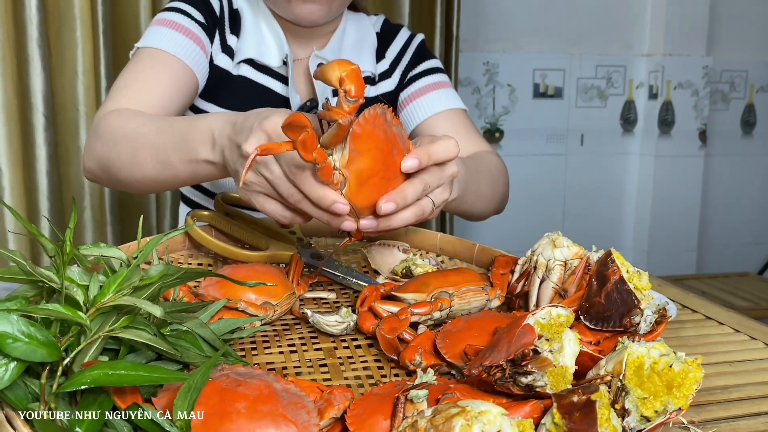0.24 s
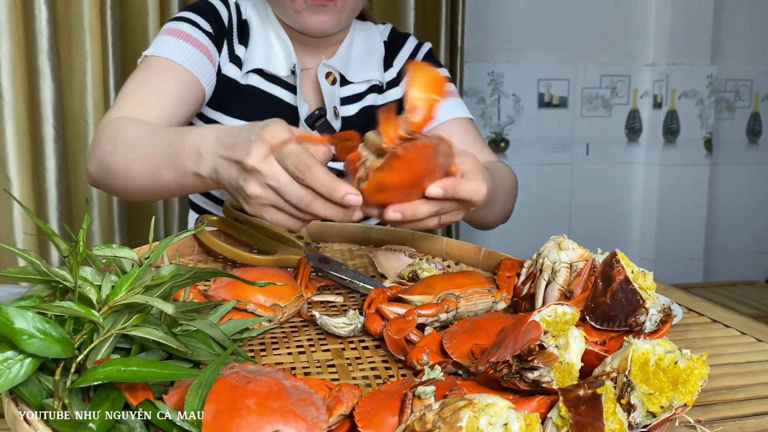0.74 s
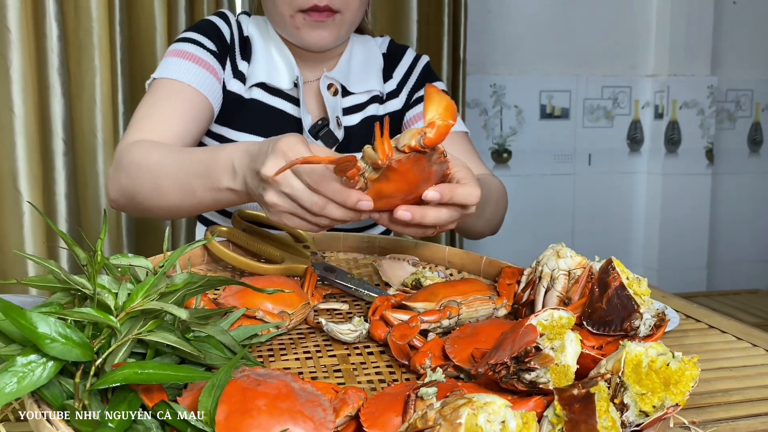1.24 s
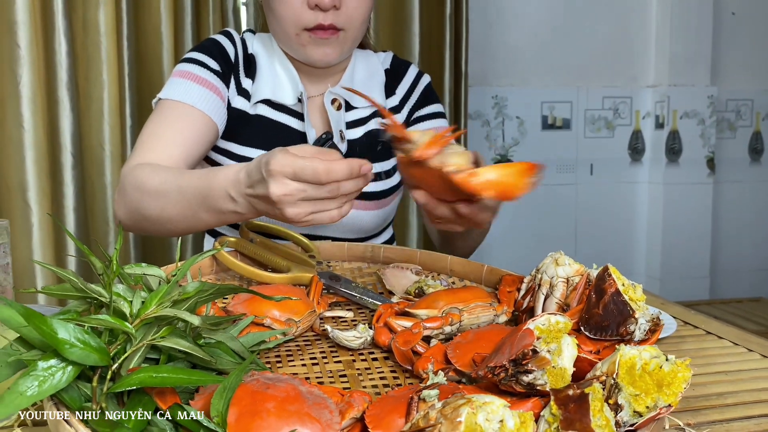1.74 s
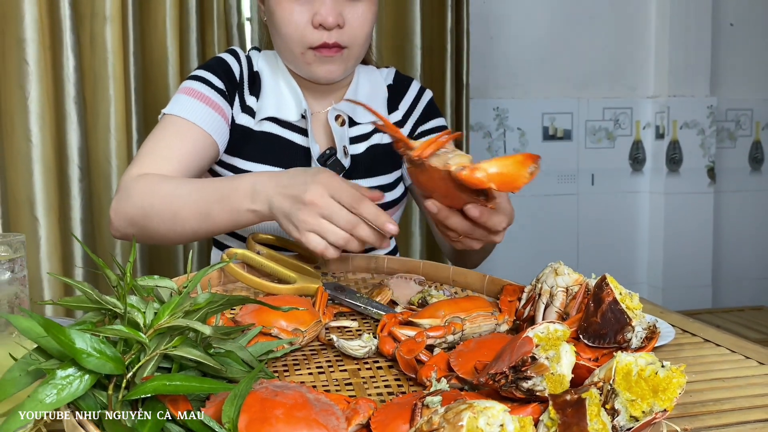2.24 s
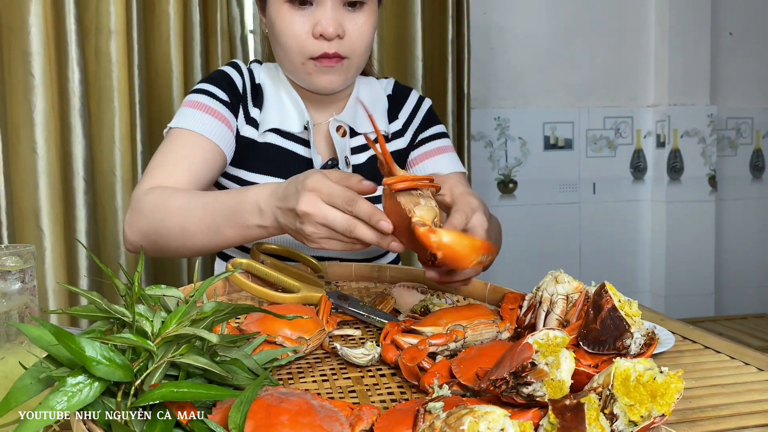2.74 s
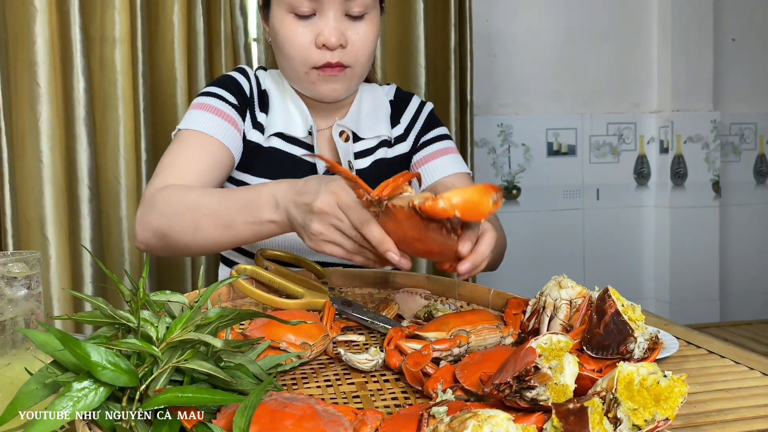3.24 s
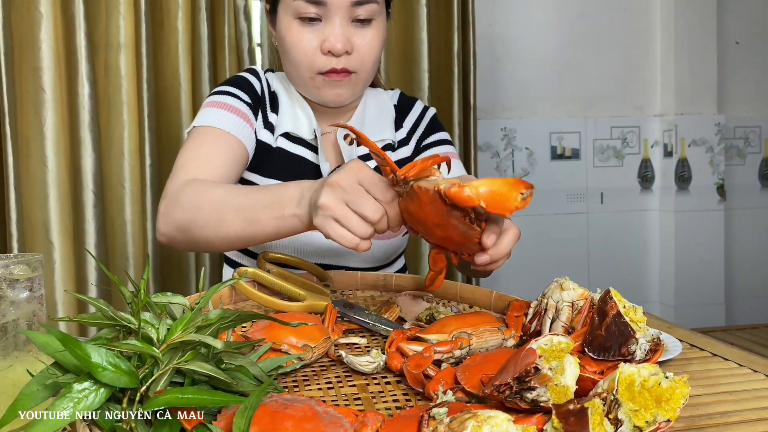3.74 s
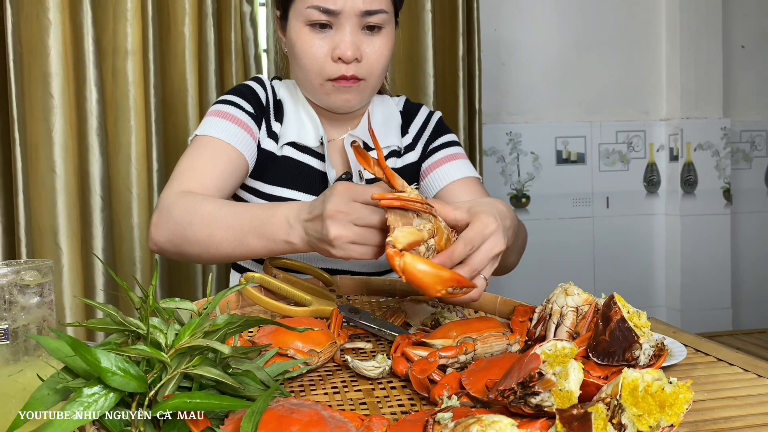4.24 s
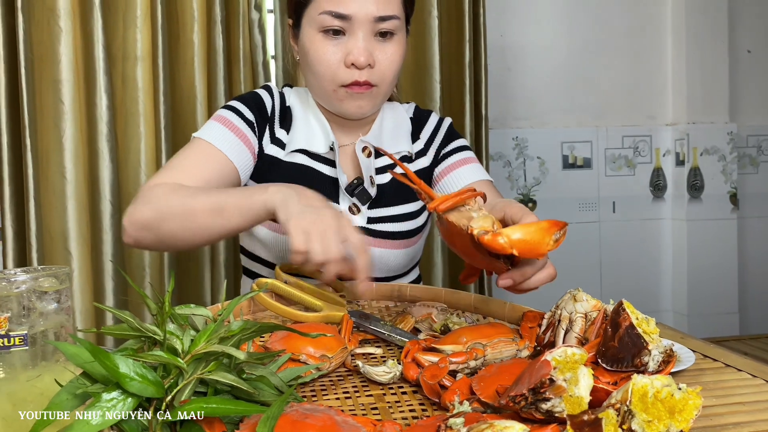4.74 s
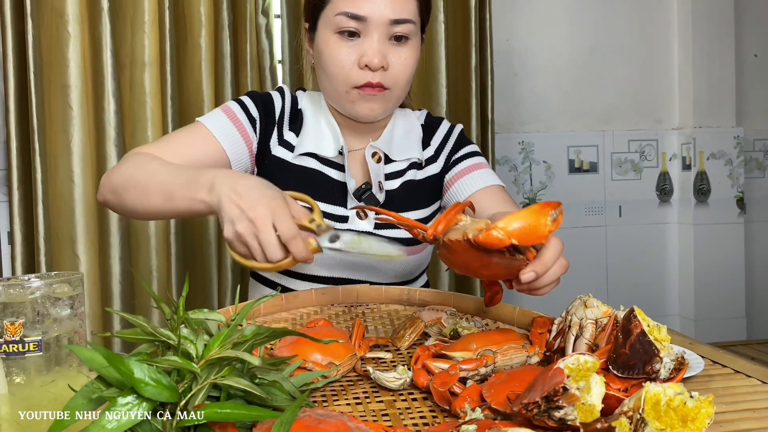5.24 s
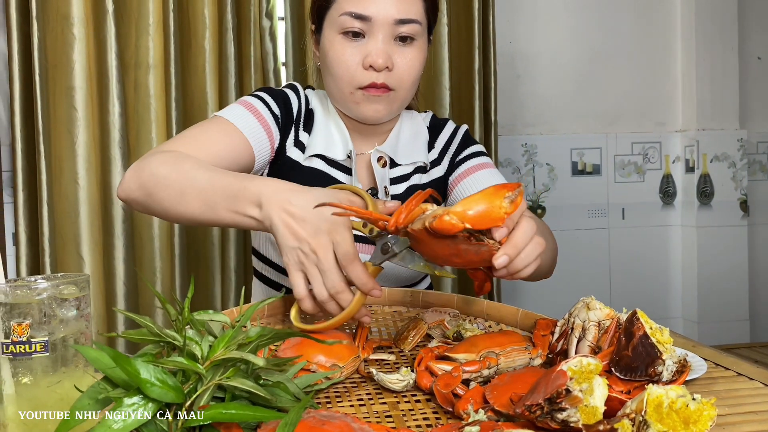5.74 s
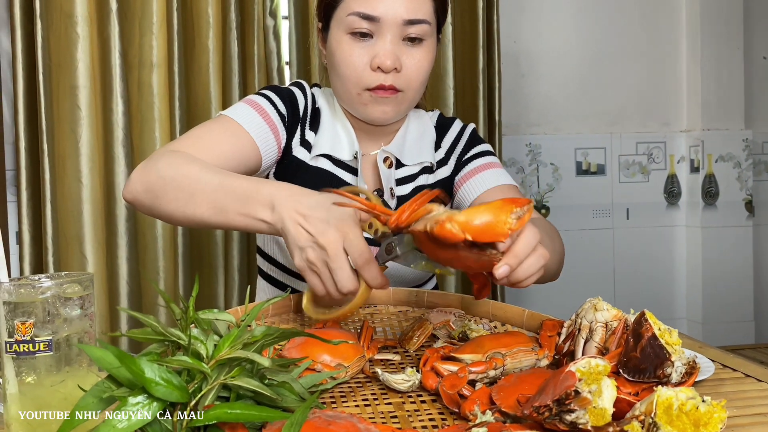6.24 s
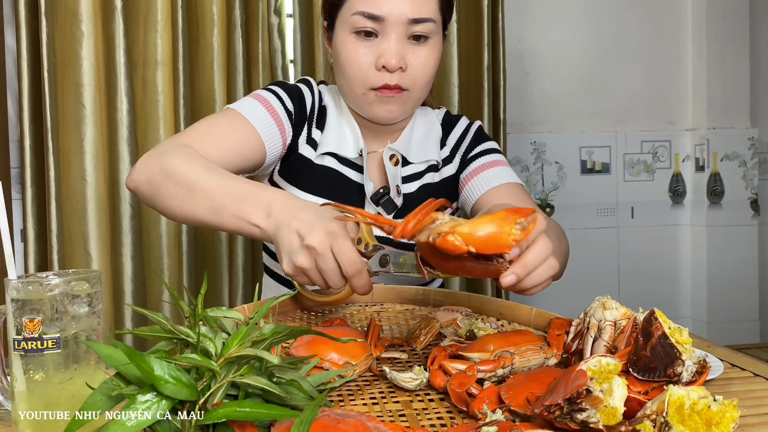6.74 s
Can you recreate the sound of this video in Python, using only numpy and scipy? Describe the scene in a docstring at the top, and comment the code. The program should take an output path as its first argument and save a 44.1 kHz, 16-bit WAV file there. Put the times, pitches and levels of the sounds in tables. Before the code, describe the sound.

In a small quiet room with a faint motor hum, crab shell ticks, creaks and cracks between the fingers, close up, in irregular bursts with pauses between. A ringing metal clink follows as scissors are lifted, with a few lighter clicks as they open. They crunch into a crab leg in a quick run of brittle cracks, ending in a single loud snap with a brief echo.

```python
"""Cracking a crab at the table

A cooked crab is pulled apart by hand over a table, close to the microphone in a small quiet room.
Its joints tick and crunch as fractures ring pieces of shell. Steel scissors are picked up with a clink,
opened, and bite into a leg, which crackles under the blades and gives way with one loud snap.
Behind it all lie the room's short echo, its steady air and the hum of a distant motor."""
import sys
import numpy as np
from scipy import signal
from scipy.fft import rfft, irfft
from scipy.io import wavfile

SR = 44100
rng = np.random.default_rng(int(sys.argv[2]) if len(sys.argv) > 2 else 0)


def pcm_store(signal):
    """Save signal as 16-bit PCM."""
    levels = np.round(np.clip(np.atleast_2d(signal), -1, 1) * 32767)
    wavfile.write(sys.argv[1], SR, levels.astype(np.int16).T)


N = 308700
HZ = np.fft.rfftfreq(4096, 1 / SR)
IMPACT_S = 1 / 200  # levels of single impacts are rms over this time
IMPACT_GAIN = np.sqrt(IMPACT_S * SR)
SCISSORS_FROM_S = 5.0  # the shell breaks in the hands before this, between the blades after

# Single cracks close to the microphone: joints give, a small leg is twisted off, the blades bite in.
# Each row: start in seconds, strength in dB, hollowness in dB, brightness in dB.
CRACKS = [(0.3219, -54, -15, 3), (0.5, -36.5, -4, -1.5), (0.7107, -54.5, -21, 2), (0.7376, -30.5, -25, 1.5),
          (0.7599, -32, -25, 0), (0.7784, -36.5, -17, 2), (0.7838, -38.5, -16, -0.5),
          (0.8012, -39.5, -14, 1.5), (0.84, -47, -24, 0.5), (1.2398, -53.5, -24, 1),
          (1.2763, -47, -13, 4.5), (1.4794, -56, -17, 1), (1.499, -56, -27, 5), (1.5146, -42, -26, 3.5),
          (1.63, -50.5, -17, 2), (1.7037, -41.5, -11, -0.5), (2.1505, -43.5, -17, -3),
          (2.5708, -56, -1, 2.5), (2.7545, -66, 5, 2), (3.6282, -36.5, -15, 4.5), (3.684, -40.5, -2, -5),
          (3.7485, -44.5, -12.5, 2.5), (3.7857, -55, -12, 2), (3.8875, -32, -13.5, 4.5),
          (3.923, -41, -6.5, 0.5), (3.952, -45, -11, 3.5), (3.978, -42, -4, 1.5), (4.002, -40, -19, 5),
          (4.0498, -38.5, -9.5, 6), (4.0968, -28, -9, 3), (4.0997, -32, -8.5, 7), (4.216, -47.5, -3, 3),
          (4.235, -51.5, 9, 3), (4.2663, -54.5, 13.5, -5.5), (4.296, -50.5, -4, 4), (4.34, -41.5, -1, -0.5),
          (4.6097, -57, -0.5, -4), (5.6868, -49.5, 10.5, -4.5), (6.0085, -55.5, 9.5, -4.5),
          (6.2342, -34, -24, 5.5), (6.2478, -42, -17, 4), (6.2752, -34, -6, -2), (6.288, -20.5, -37, 6.5),
          (6.3246, -30.5, -28, 1.5), (6.332, -34.5, -18, -0.5), (6.3926, -34, -17.5, -3.5),
          (6.411, -43, -27, 1), (6.4875, -22.5, -16, 0), (6.5229, -26.5, -13.5, -0.5),
          (6.5988, -42.5, -9, 3), (6.621, -40, -10, 2), (6.6424, -34.5, -12, 3), (6.7033, -32, -23.5, 0.5)]
def cracks(pieces, usual_db=-38.5, db_per_doubling=38, rattle_db=-17, rattle_s=0.0051):
    """A sharp release, a split that runs on longer in strong cracks, and a faint rattle of the shell."""
    out, t = np.zeros(N), np.arange(SR // 50) / SR
    for s, strength_db, hollow_db, bright_db in CRACKS:
        usual_split_s = 0.0019 if s > SCISSORS_FROM_S else 0.0012
        split_s = usual_split_s * 2 ** ((strength_db - usual_db) / db_per_doubling)
        split, rattle = rng.standard_normal((2, len(t)))
        force = unit(split * np.exp(-t / split_s)) + amp(rattle_db) * unit(rattle * np.exp(-t / rattle_s))
        force[0] += 1  # the release
        add(out, s, shell(force, pieces, s, strength_db, hollow_db, bright_db, IMPACT_S))
        add(out, s, amp(strength_db - bright_db) * IMPACT_GAIN * plate_ring(t))  # dull cracks ring more
    return out


# Bending notes of the shell plate. Each row: pitch in Hz, relative level in dB, t60 in seconds.
PLATE_MODES = [(3076, -17, 0.018), (3538, -10.5, 0.013)]
def plate_ring(t, detune=.03):
    """The plate rings briefly after a crack, a little higher or lower each time."""
    size = 1 + detune * rng.standard_normal()
    return sum(amp(db) * unit(amp(-60 * t / t60) * np.sin(2 * np.pi * hz * t / size))
               for hz, db, t60 in PLATE_MODES)


# The shell creaks, tears or is crushed, close up. Each row: start and length in seconds,
# fractures per second, then relative strength, hollowness and brightness in dB.
CRUNCHES = [(0.05, 0.15, 37, -83, 2, 1), (0.696, 0.017, 350, -60, -24, 3),
            (0.767, 0.014, 1100, -44, -11, -5), (0.792, 0.031, 940, -56, -1, 0),
            (1.181, 0.079, 130, -72.5, -18, -4.5), (1.295, 0.015, 900, -52, -7.5, 0.5),
            (1.689, 0.048, 1070, -53.5, 3, 0), (2.12, 0.023, 1260, -64, 7, -6),
            (2.622, 0.019, 1160, -60.5, -10, -2), (2.831, 0.16, 24, -77, 1, -4),
            (4.284, 0.068, 220, -55, -11, 2.5), (5.689, 0.029, 1930, -55.5, 10, -2),
            (5.851, 0.025, 1200, -66, 10.5, 0), (5.995, 0.021, 1570, -50.5, 2, -2),
            (6.178, 0.046, 140, -66, -19, 4.5), (6.282, 0.03, 1700, -24.5, -11, 2.5),
            (6.311, 0.034, 1440, -42.5, -1.5, -1), (6.536, 0.015, 1330, -36.5, -5.5, 2)]
def crunches(pieces, spread_db=1.5, gain_db=-2):
    """Tiny fractures of uneven size: a slow run creaks tick by tick, a fast one blurs into a crunch."""
    out = np.zeros(N)
    for s, length_s, per_second, strength_db, hollow_db, bright_db in CRUNCHES:
        chance, size, sign = rng.random((3, SR // 4))[:, :round(length_s * SR)]
        fractures = (chance < per_second / SR) * np.sign(sign - .5)
        force = fractures * amp(-spread_db * np.log(size + 0.06))
        force *= signal.windows.tukey(len(force), .2)
        add(out, s, shell(force, pieces, s, strength_db, hollow_db, bright_db, length_s))
    return amp(gain_db) * out


# Colour of the leg as it is cut through. Each row: frequency in Hz, gain in dB.
SNAP_COLOUR = [(50, -22), (250, -13.5), (600, -2), (1000, 0), (1300, -4.5), (2000, -5.5), (2500, -5),
               (3400, 0.5), (3900, 4), (4600, -2), (6700, 7.5), (7400, 6), (8000, 8), (9200, -1.5),
               (10400, 4.5), (11700, -3), (13400, 8.5), (16000, -14)]
def snap(peak_s=6.7792, db=-8, strain_s=0.0019, strain_db=-8, burst_s=0.0017, push_db=-29, push_s=0.0007):
    """Fractures swell for a few milliseconds until the leg bursts; the jolt sends out a low push."""
    out, t = np.zeros(N), np.arange(-SR // 220, SR // 100) / SR
    swell = np.exp(-(t / burst_s) ** 2) + amp(strain_db) * np.exp(-abs(t) / strain_s)
    burst = signal.fftconvolve(swell * rng.standard_normal(len(t)), causal(amp(read(SNAP_COLOUR, HZ))))
    add(out, peak_s + t[0], amp(db) * IMPACT_GAIN * unit(burst))
    push_age = (t - t[0]) / push_s
    add(out, peak_s, amp(push_db) * push_age * np.exp(1 - push_age))
    return out


def shell(force, pieces, s, strength_db, hollow_db, bright_db, length_s, plate_db=-4, splinter_db=-2.5):
    """A force rings one piece. Hollowness lifts the cavity; brightness trades plate for splinters."""
    levels_db = strength_db + np.array([hollow_db, plate_db - bright_db, 0, splinter_db + bright_db])
    choices = pieces["cut" if s > SCISSORS_FROM_S else "held"]
    bands = signal.fftconvolve(force[None], choices[rng.integers(len(choices))], axes=1)
    return sum(amp(db) * unit(band) for db, band in zip(levels_db, bands)) * np.sqrt(length_s * SR)


# Colour of shell broken in the hands, and between the blades. Each row: frequency in Hz, gain in dB.
HELD_COLOUR = [(80, -23), (170, -8), (420, 0.5), (750, 1), (1150, -4), (1600, -5.5), (3200, -1),
               (4600, -0.5), (7000, 5), (10000, 7.5), (12500, 2.5), (15000, -5.5), (16000, -2.5)]
CUT_COLOUR = [(80, -29.5), (170, -11.5), (400, -3.5), (750, -3.5), (1150, -10.5), (1600, -12.5), (3000, -5),
              (4500, -1), (5500, 0), (9500, 8.5), (11500, 9.5), (15000, 3.5), (16000, -20)]
# Resonances of a middling piece of shell. Each row: centre in Hz, width in Hz, lift in dB.
SHELL_MODES = [(560, 140, 7.5), (863, 370, 8.5), (1964, 280, 5), (2500, 220, -9.5), (3380, 1000, 4.5),
               (6700, 650, -1.5), (7890, 1100, 2.5), (13500, 900, 8)]
def shell_piece(grip, size, plate_hz=1400, edge_hz=5000, splinter_hz=10000):
    """Responses of a piece's cavity, plate, broken edge and splinters. Larger pieces ring lower."""
    colour_db = read(CUT_COLOUR if grip == "cut" else HELD_COLOUR, HZ)
    modes_db = sum(lift / (1 + (2 * (HZ * size - hz) / width) ** 2) for hz, width, lift in SHELL_MODES)
    lowpasses = [1 / (1 + (HZ / hz) ** 10) for hz in (plate_hz, edge_hz, splinter_hz)]
    bands = np.diff(lowpasses, axis=0, prepend=0, append=1)
    return np.array([causal(amp(colour_db + modes_db) * np.sqrt(abs(band))) for band in bands])


# Steel meets steel or shell near the microphone.
# Each row: start in seconds, ring level in dB, opening (0 shut, 1 open), tick in dB against the ring.
CLINKS = [(5.0593, -50, 0, -10), (5.0641, -18, 0, -5), (5.1641, -48, 0, 3), (5.1658, -45.5, 0, 8.5),
          (5.3790, -36.5, 1, -4), (5.383, -33, 1, -15.5), (6.779, -26, 1, -5), (6.985, -46, 1, 1),
          (6.9912, -40, 1, -8)]
# Modes of the scissors, shut and open. Each row: pitch in Hz, relative level in dB, t60 in seconds.
SHUT_MODES = [(3996, 0, 0.075), (3080, -18, 0.064), (7320, -1, 0.04), (7200, -21.5, 0.3),
              (8930, -11.5, 0.073), (10250, -10, 0.056), (13370, -3.5, 0.034), (12870, -23.5, .3),
              (13400, -12.5, .05), (14100, -5, .045), (13900, -6, .04), (2200, -14, 0.027)]
OPEN_MODES = [(3780, -13.5, 0.024), (5534, -9.5, 0.053), (6820, -12.5, 0.045), (7250, -8, 0.027),
              (7500, -11, 0.019), (8160, 5, 0.024), (8580, -31, 0.091), (9900, -13, 0.01),
              (10330, -6, 0.036), (12700, -7, 0.041), (12650, 1, 0.0083), (15300, -3, .02)]
# Colour of the steel's contact tick. Each row: frequency in Hz, gain in dB.
CONTACT_COLOUR = [(200, -22), (1000, -10.5), (2100, -1), (2800, -10.5), (5400, 5.5), (6500, 0.5), (9500, 6),
                  (11500, -4), (13500, 8), (16000, -14)]
def scissors(tick_s=0.0038):
    """A contact tick sets the blades ringing; their modes change once they are open."""
    out, t = np.zeros(N), np.arange(SR // 5) / SR
    contact = causal(amp(read(CONTACT_COLOUR, HZ)))
    for s, db, opening, tick_db in CLINKS:
        modes = OPEN_MODES if opening > .5 else SHUT_MODES
        ring = sum(amp(level - 60 * t / t60) * np.sin(2 * np.pi * (hz * t + rng.random()))
                   for hz, level, t60 in modes)
        tick = signal.fftconvolve(rng.standard_normal(len(t)) * np.exp(-t / tick_s), contact)[:len(t)]
        add(out, s, amp(db) * IMPACT_GAIN * (unit(ring) + amp(tick_db) * unit(tick)))
    return out


def tray(lifted_s=5.063, db=-53, hz=550, decay_s=0.004):
    """The scissors give the woven tray a short, dull knock as they are lifted."""
    out, t = np.zeros(N), np.arange(SR // 20) / SR
    body = signal.butter(2, [hz / 2, hz * 2], "bandpass", fs=SR, output="sos")
    knock = signal.sosfilt(body, rng.standard_normal(len(t)) * np.exp(-t / decay_s))
    add(out, lifted_s, amp(db) * IMPACT_GAIN * unit(knock))
    return out


def settling(pieces, count=30, under_db=-18, spread_db=3.0, mean_delay_s=0.014):
    """Loosened shell settles with a faint tick just after a crack, in proportion to it."""
    out = np.zeros(N)
    for crack in rng.permutation(len(CRACKS))[:count]:
        s, strength_db = CRACKS[crack][:2]
        s += mean_delay_s * rng.gamma(2) / 2
        add(out, s, shell_tick(pieces, s, strength_db + under_db + spread_db * rng.standard_normal()))
    return out


def turning(pieces, count=18, until_s=3.2, strength_db=-73, spread_db=4.5):
    """Loose legs tick against the body at random while the fingers turn the crab over."""
    out = np.zeros(N)
    for when, size in rng.random((count, 2)):
        s, db = when * until_s, strength_db + spread_db * (2 * size - 1)
        add(out, s, shell_tick(pieces, s, db, hollow_db=-12, bright_db=-4))
    return out


def shell_tick(pieces, s, strength_db, hollow_db=-8, bright_db=-1, decay_s=0.0011):
    """One faint tick of strained shell."""
    t = np.arange(SR // 200) / SR
    force = rng.standard_normal(len(t)) * np.exp(-t / decay_s)
    return shell(force, pieces, s, strength_db, hollow_db, bright_db, len(t) / SR)


# Decay of the small room around the table. Each row: frequency in Hz, t60 in seconds.
ROOM_T60 = [(200, .4), (700, 0.77), (1500, 0.5), (4000, 0.51), (8000, 0.49), (15000, 0.43)]
# Colour of its echo at the microphone. Each row: frequency in Hz, relative gain in dB.
ROOM_COLOUR = [(200, -10.5), (600, -14.5), (1200, -1.5), (3000, -11), (7000, -12.5), (13000, -12.5),
               (16000, -9)]
def room(x, first_delay_s=0.0013, build_s=0.00094, early_db=3, early_s=0.057):
    """Dense reflections build up quickly, strongest early on; each band dies at its own speed."""
    hz, frame_s, bands = signal.stft(rng.standard_normal(SR), SR, nperseg=256)
    t60 = read(ROOM_T60, hz)[:, None]
    bands *= amp(read(ROOM_COLOUR, hz)[:, None] - 60 * frame_s / t60)
    bands *= np.sqrt(np.log(1e6) / (t60 * SR))  # a longer decay adds no energy
    tail, t = signal.istft(bands, SR, nperseg=256)[1][:SR], np.arange(SR) / SR
    build_up = 1 - np.exp(-np.maximum(t - first_delay_s, 0) / build_s)
    early_lift = amp(early_db * np.exp(-t / early_s))
    return signal.fftconvolve(x, tail * build_up * early_lift)[:N]


# Colour of the quiet room's air. Each row: frequency in Hz, relative gain in dB.
AIR_COLOUR = [(15, -24.5), (25, -13), (42, -12.5), (70, -12), (100, -8.5), (130, -6), (200, -6), (290, -3),
              (360, -9), (550, -9.5), (1000, -17), (2300, -28.5), (4200, -27), (8000, -34.5),
              (14000, -33.5), (16000, -41.5)]
# A motor far from the microphone. Each row: pitch in Hz, level in dB.
MOTOR_HUM = [(40, -76), (61, -83.5), (100, -74.5), (280, -77.5)]
def room_tone(air_db=-66, hum_width_hz=0.83):
    """Steady room noise with the wavering hum of a distant motor."""
    hz = np.fft.rfftfreq(N, 1 / SR)
    noise = rfft(rng.standard_normal(N))
    out = amp(air_db) * unit(irfft(noise * amp(read(AIR_COLOUR, hz)), N))
    for centre, db in MOTOR_HUM:
        narrow_peak = 1 / (1 + ((hz - centre) / hum_width_hz) ** 2)
        out += amp(db) * unit(irfft(1j * noise * narrow_peak, N))
    return np.sqrt(N) * out


def amp(db):
    """Decibels to gain."""
    return 10 ** (np.asarray(db) / 20)


def unit(x):
    """Scales a sound to energy 1."""
    return x / np.sqrt(np.sum(x ** 2) + 1e-20)


def read(points, hz):
    """Reads a table on a log-frequency axis."""
    f, value = np.transpose(points)
    return np.interp(np.log(hz + 1), np.log(f + 1), value)


def add(mix, s, sound):
    """Mixes a sound in at s seconds."""
    part = mix[round(s * SR):][:len(sound)]
    part += sound[:len(part)]


def causal(gain):
    """Minimum-phase impulse response of a gain curve on the HZ grid."""
    log_gain = np.log(np.maximum(gain, 1e-5))
    mirrored = np.concatenate([log_gain, log_gain[-2:0:-1]])
    spectrum = np.exp(np.conj(signal.hilbert(mirrored)))
    return np.fft.ifft(spectrum).real[:len(mirrored) // 4]


def scene(crab_room_db=-1, snap_room_db=-2, steel_room_db=-6, size_spread=0.027):
    """Shell and scissors close to one microphone; both sides of the breaking shell sound into the room."""
    sizes = np.exp(size_spread * np.linspace(-1, 1, 3))
    pieces = {grip: [shell_piece(grip, size) for size in sizes] for grip in ("held", "cut")}
    crab = cracks(pieces) + crunches(pieces) + settling(pieces) + turning(pieces)
    leg_snap = snap()
    steel = scissors() + tray()
    front = amp(crab_room_db) * crab + amp(snap_room_db) * leg_snap
    # the far side radiates the same fractures with other fine detail, heard only by way of the walls
    back = amp(crab_room_db) * (cracks(pieces) + crunches(pieces)) + amp(snap_room_db) * snap()
    echo = room(front / np.sqrt(2) + amp(steel_room_db) * steel) + room(back / np.sqrt(2))
    return (crab + leg_snap + steel + echo + room_tone())[None]


def record(dry, cutoff_hz=16200):
    """The loudest peak overloads the input; a steep low-pass then trims the highest treble."""
    clipped = np.clip(dry, -1, 1)
    lowpass = signal.firwin(255, cutoff_hz, window=("kaiser", 9), fs=SR)
    return signal.oaconvolve(clipped, lowpass[None], "same")


dry = scene()
out = record(dry)
pcm_store(out)
```